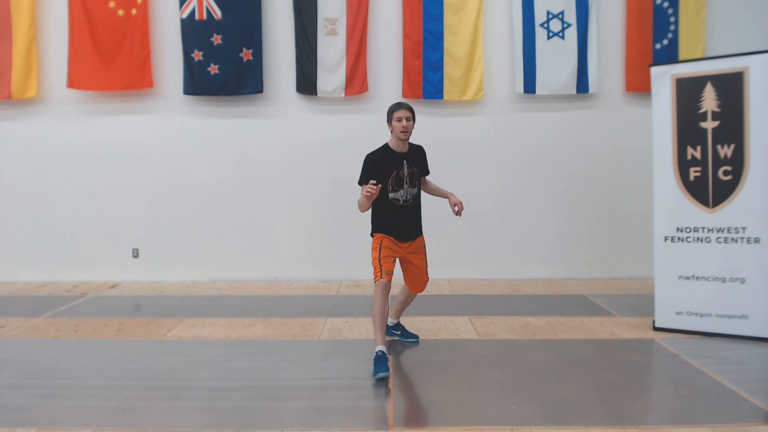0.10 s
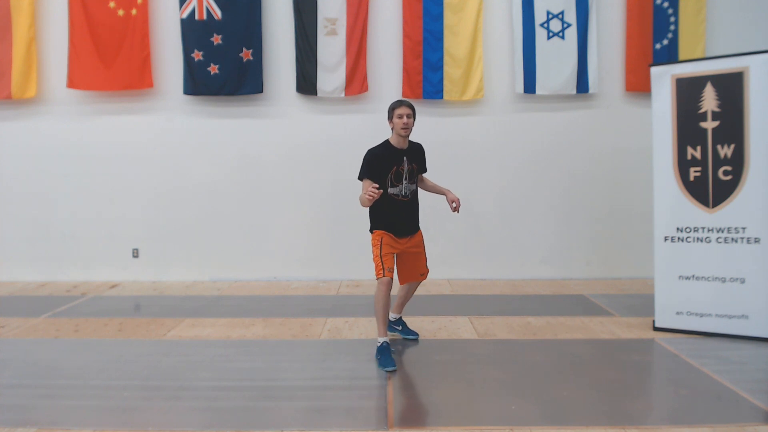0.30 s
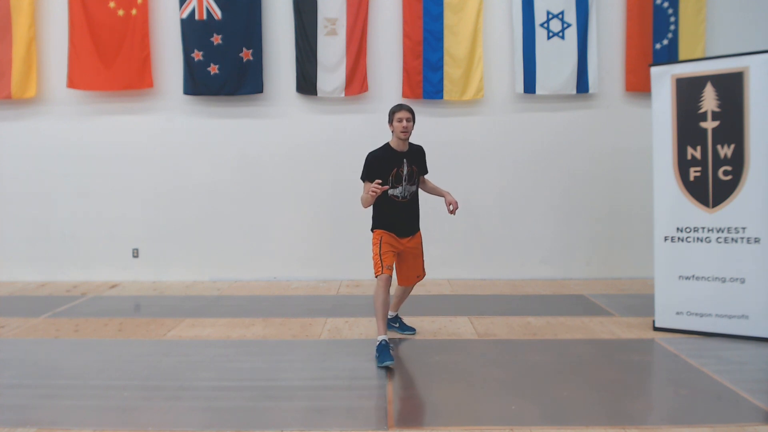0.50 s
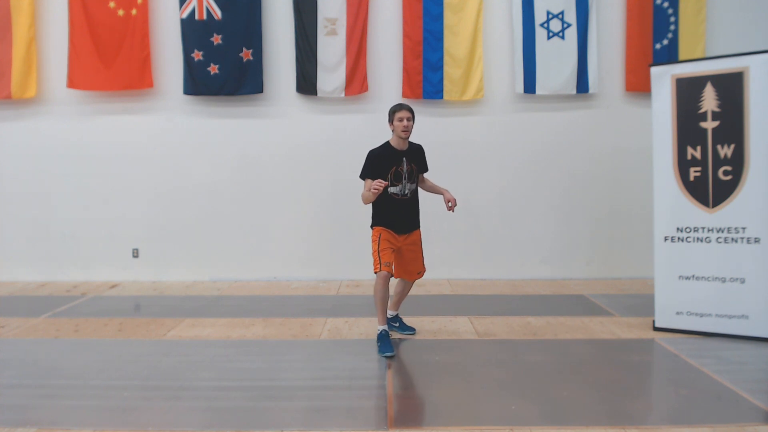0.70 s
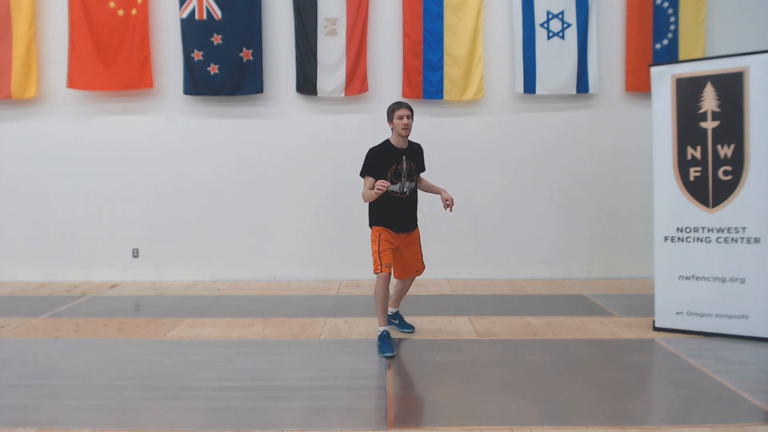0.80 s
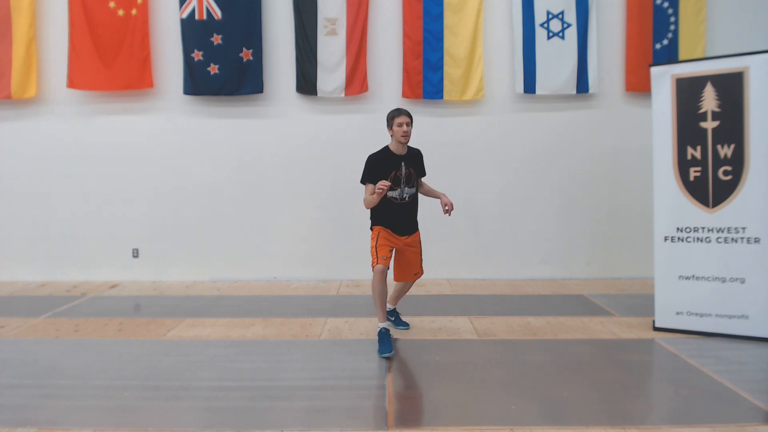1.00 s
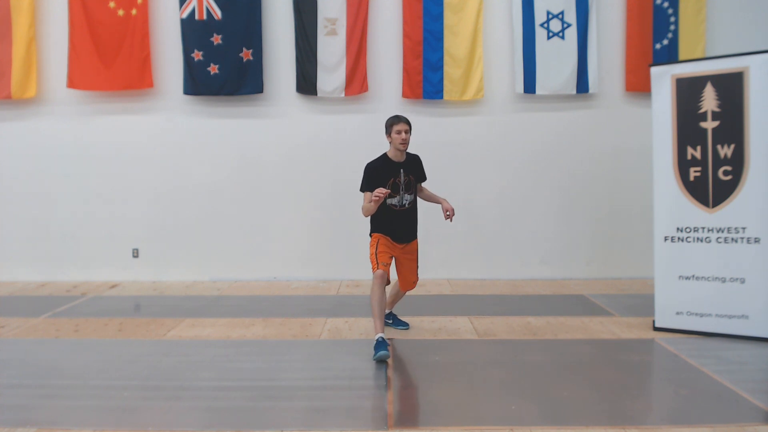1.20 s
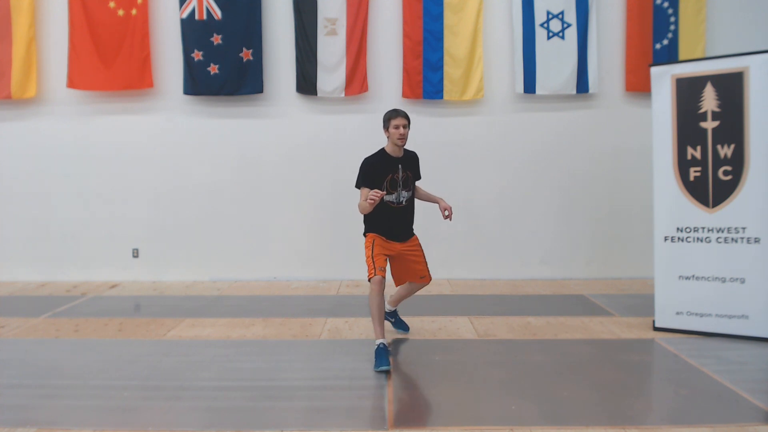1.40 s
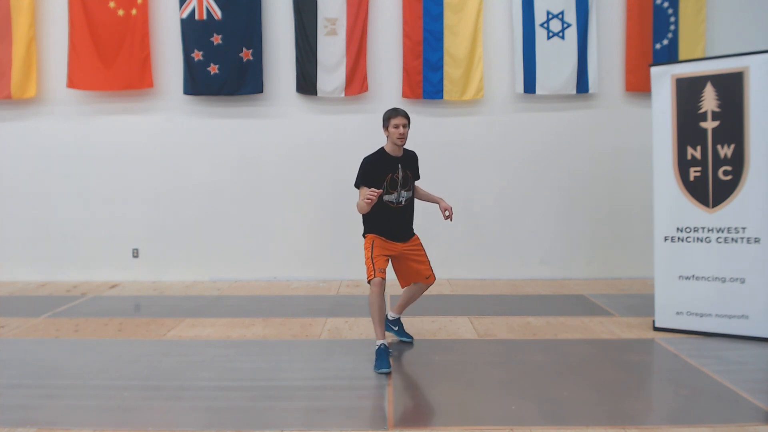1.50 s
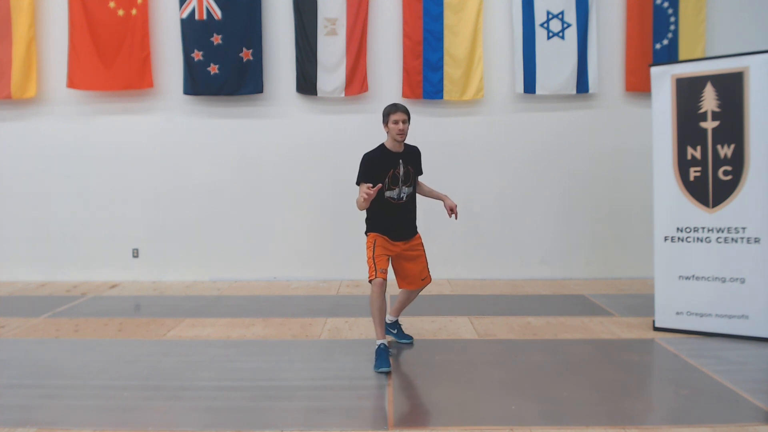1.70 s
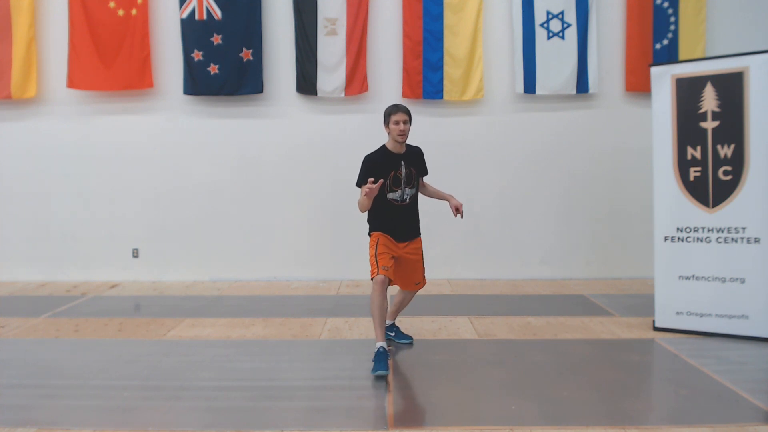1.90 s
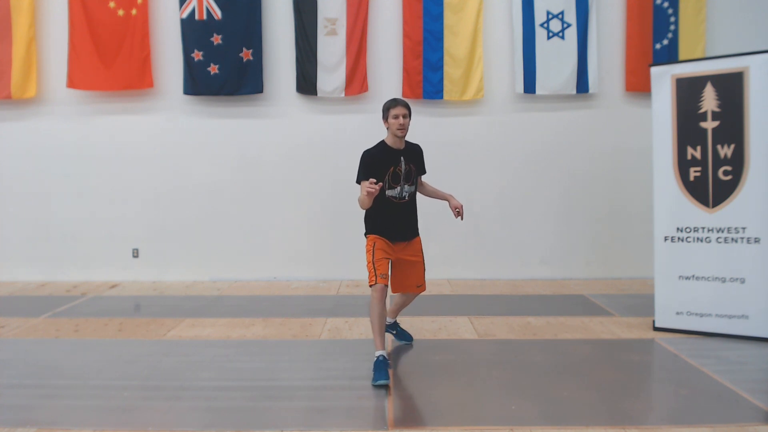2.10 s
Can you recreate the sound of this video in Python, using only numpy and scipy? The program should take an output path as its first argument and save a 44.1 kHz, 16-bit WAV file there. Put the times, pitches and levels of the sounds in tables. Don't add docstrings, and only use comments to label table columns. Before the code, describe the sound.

In a big reverberant gym, rubber soles give two piercing chirps early on, their ringing tails fading; quiet shuffles and light taps of feet continue over fan hum and faint air noise, miked from several metres away.

```python
import sys
import numpy as np
from scipy import signal
from scipy.fft import rfft, irfft
from scipy.io import wavfile
from scipy.ndimage import uniform_filter1d

SR = 44100
rng = np.random.default_rng(int(sys.argv[2]) if len(sys.argv) > 2 else 0)


def voltage_ratio(decibels):
    exponent = np.asarray(decibels, float) / 20
    return 10 ** exponent


def master(y):
    cut = np.clip(np.atleast_2d(y).T, -1, 1)
    pcm = np.round(cut * 32767)
    wavfile.write(sys.argv[1], SR, pcm.astype(np.int16))


N = 94815
LEAD_S = 0.8
M = N + int(LEAD_S * SR)
T = np.arange(M) / SR - LEAD_S
F = np.maximum(np.fft.rfftfreq(M, 1 / SR), 1)


def unit(x):
    return x / np.sqrt(np.mean(x ** 2))


def colour(x, gain_db):
    return irfft(rfft(x, M) * voltage_ratio(gain_db), M)


def shape(points):
    point_hz, point_db = np.array(points, float).T
    return np.interp(np.log(F), np.log(point_hz), point_db)


def walk(rate_hz):
    return unit(colour(rng.standard_normal(M), -20 * np.log10(1 + (F / rate_hz) ** 4)))


def gate(start_s, length_s, rise_s, fall_s):
    rise = np.clip((T - start_s) / rise_s, 0, 1) ** 2
    return rise * np.exp(-np.maximum(T - start_s - length_s, 0) / fall_s)


def squeaks():
    # start_s, pitch_hz, level_db
    grips = [
        [(-.5, 4300, -25), (-.49, 4100, -17.5), (-.48, 3950, -24)],
        [(.222, 4400, -31.5), (.226, 4298, -9.5), (.232, 4163, -8.5), (.2355, 4100, -18), (.24, 3973, -7),
         (.244, 4017, -22.5)],
        [(.687, 4500, -27.5), (.692, 4356, -12.5), (.699, 4296, -8.5), (.704, 4020, -15.5), (.709, 4060, -19)],
    ]
    # hold_s, second_partial_db, third_partial_db, chatter_db
    bites = [
        (0.017, -20, -39.5, -30.5),
        (.013, -15, -28, -22),
        (0.015, -16.5, -37, -28.5),
    ]
    # frequency_hz, level_db
    chatter_spectrum = [(1800, -45), (2700, -13), (3500, -6), (4700, 6), (5900, -0.5), (6800, -7),
                        (10000, -15), (14500, -20)]
    attack_s, release_s, chatter_hold_s = 0.005, 0.005, 0.015
    jitter_hz, lowest_hz = 75, 3980

    jitter = jitter_hz * walk(900)
    flutter = voltage_ratio(3 * walk(210))
    chatter = unit(colour(rng.standard_normal(M), shape(chatter_spectrum)))
    out = 0
    for grip, (hold_s, second_db, third_db, chatter_db) in zip(grips, bites):
        grip_s, pitch_hz, level_db = np.array(grip, float).T
        start_s = grip_s[0]
        pitch = np.maximum(np.interp(T, grip_s, pitch_hz), lowest_hz) + jitter
        phase = 2 * np.pi * np.cumsum(pitch) / SR

        tone = voltage_ratio(np.interp(T, grip_s, level_db)) * np.sin(phase)
        tone = tone * gate(start_s, grip_s[-1] - start_s, 0.0022, 0.0041)
        partials = voltage_ratio(second_db) * np.sin(2 * phase) + voltage_ratio(third_db) * np.sin(3 * phase)
        bite = gate(start_s, hold_s, attack_s, release_s) * partials

        out = out + tone * flutter ** 0.44 + bite * flutter
        out = out + voltage_ratio(chatter_db) * gate(start_s, chatter_hold_s, attack_s, release_s) * chatter
    return out


def scuffs():
    # start_s, length_s, level_db, brightest_hz, spread_octaves
    strokes = [(.03, .012, -60, 6645, 0.27), (0.091, 0.025, -60.5, 7200, 0.37),
               (.189, 0.044, -45.5, 6100, 1.34), (0.395, .045, -58.5, 12500, 0.54),
               (.555, 0.012, -62.5, 9100, 0.43), (0.645, .045, -53.5, 8000, 1),
               (0.877, 0.049, -54.5, 9470, 0.88), (0.993, 0.0087, -50.5, 7500, 0.14),
               (0.997, 0.015, -59, 8000, 0.77), (1.013, 0.0073, -47, 6000, 0.32),
               (1.177, 0.028, -57, 7140, .6), (1.333, 0.0091, -65.5, 7880, 0.66),
               (1.458, .01, -75, 8500, 0.17), (1.514, 0.0314, -49.5, 6150, 0.45),
               (1.53, 0.019, -61, 12000, 0.54), (1.83, 0.018, -57.5, 6500, 0.36),
               (1.978, 0.027, -59.5, 7930, 0.28), (2.13, 0.03, -66, 6650, 0.8)]
    edge_s, grains_per_s, grain_db = 0.005, 12000, 1.3

    chance, strength = rng.random((2, M))
    grains = (chance < grains_per_s / SR) * voltage_ratio(-grain_db * np.log(1 - strength))
    grit = rng.standard_normal(M) * (0.3 + grains)
    out = 0
    for start_s, length_s, level_db, brightest_hz, octaves in strokes:
        distance = np.log2(F / brightest_hz) / octaves
        band = unit(colour(grit, -10 * np.log10(1 + distance ** 4)))
        out = out + voltage_ratio(level_db) * gate(start_s, length_s, edge_s, edge_s) * band
    return out


def taps():
    # start_s, level_db, top_hz
    landings = [(0.192, -40.5, 250), (0.395, -37, 694), (0.407, -41, 804), (0.65, -45, 2130),
                (0.861, -47.5, 2253), (.872, -40.5, 467), (1.181, -45.5, 1500), (1.4, -39, 202),
                (1.982, -43, 5170), (2.14, -41.5, 2476), (.005, -41, 604), (1.991, -42.5, 199)]
    t60_s, low_hz = 0.031, 115

    noise = rng.standard_normal(M)
    out = 0
    for start_s, level_db, top_hz in landings:
        treble_loss = 1 + (F / top_hz) ** 6
        bass_loss = 1 + (low_hz / F) ** 4
        band = unit(colour(noise, -10 * np.log10(treble_loss * bass_loss * F)))
        out = out + voltage_ratio(level_db) * gate(start_s, 0.00044, 0.00033, t60_s / np.log(1000)) * band
    return out


def hall(x):
    # delay_s, level_db, top_hz
    echoes = [(.014, 0, 6300), (.027, -10, 6500), (.038, -13, 7000), (.051, -7, 6500), (.066, -16, 6500)]
    # frequency_hz, t60_s, level_db
    tail = [(500, 4.8, -7.5), (2795, 1.476, 1), (4536, 1.115, -5.5), (6480, 1.15, -8), (8500, 0.6, -13),
            (12500, 0.44, -10)]
    smear_s, scatter, tail_rise_s = 0.001, 0.75, 0.05

    t = np.arange(M) / SR
    response = np.zeros(M)
    noise = rng.standard_normal(M)
    for delay_s, level_db, top_hz in echoes:
        scattered = noise * (t >= delay_s) * np.exp(-np.abs(t - delay_s) / smear_s)
        scattered = scatter * scattered / np.sqrt(np.sum(scattered ** 2))
        mirrored = np.arange(M) == int(delay_s * SR)
        response = response + voltage_ratio(level_db) * colour(scattered + mirrored, -10 * np.log10(1 + (F / top_hz) ** 8))

    noise_spectrum = rfft(rng.standard_normal(M))
    centres = np.log([band[0] for band in tail])
    rise = np.clip(t / tail_rise_s, 0, 1) / np.sqrt(SR / 10)
    for k, (_, t60_s, level_db) in enumerate(tail):
        weight = np.interp(np.log(F), centres, np.arange(len(centres)) == k)
        response = response + voltage_ratio(level_db - 60 * t / t60_s) * irfft(noise_spectrum * weight, M) * rise
    return x + signal.fftconvolve(x, response)[:M]


def ventilation():
    # time_s, pitch_hz, level_db
    fan = [(0, 66, -39), (.15, 60.99, -30.5), (.3, 60.2, -31), (.5, 62.5, -36.5), (0.698, 63.3, -33),
           (0.949, 64.57, -34.5), (1.298, 65.66, -31), (1.499, 66.63, -34), (1.68, 69.2, -33.5),
           (1.851, 67.1, -38.5), (2.0, 68.35, -36.5), (2.15, 66.6, -41)]
    # centre_hz, width_hz, level_db
    rumbles = [
        (35, 18, -36),
        (52, 4.7, -46),
        (88, 12, -42.5),
        (108.3, 60, -48),
    ]
    # frequency_hz, level_db
    air_spectrum = [(20, 23.5), (60, 17.5), (160, 15.5), (350, 6.5), (1300, 5), (1750, -8), (3000, -7.5),
                    (11000, -21.5), (15000, -17.5)]
    waver_hz, air_db, air_flicker_db = 4.056, -50.5, 0.5

    fan_s, fan_hz, fan_db = np.array(fan, float).T
    pitch = uniform_filter1d(np.interp(T, fan_s, fan_hz), size=1500)
    level = uniform_filter1d(np.interp(T, fan_s, fan_db), size=1500)
    phase = 2 * np.pi * np.cumsum(pitch + waver_hz * walk(5.4)) / SR
    out = np.sqrt(2) * voltage_ratio(level) * np.sin(phase)
    for centre_hz, width_hz, level_db in rumbles:
        resonance = -20 * np.log10(1 + (2 * (F - centre_hz) / width_hz) ** 2)
        out = out + voltage_ratio(level_db) * unit(colour(rng.standard_normal(M), resonance))
    air = unit(colour(rng.standard_normal(M), shape(air_spectrum)))
    return out + voltage_ratio(air_db + air_flicker_db * walk(6)) * air


def scene():
    light = scuffs() + taps()
    wet = voltage_ratio(-7)
    feet = hall(squeaks() + wet * light) + (1 - wet) * light
    return (feet + ventilation())[None, -N:]


def band_limit(x):
    return signal.sosfilt(signal.butter(12, 15960, fs=SR, output="sos"), x)


def record(dry):
    # frequency_hz, gain_db
    response = [(3000, 0), (3350, -5), (3700, -5), (3920, 0), (10000, 0), (10800, -3), (12000, 0),
                (15800, -12)]
    padded = np.pad(dry[0], (0, M - N), "reflect")
    heard = colour(padded, shape(response))[None, :N]
    top_limit = signal.ellip(8, 0.2, 60, 15950, fs=SR, output="sos")
    return band_limit(signal.sosfilt(top_limit, heard))


dry = scene()
out = record(dry)
master(out)
```